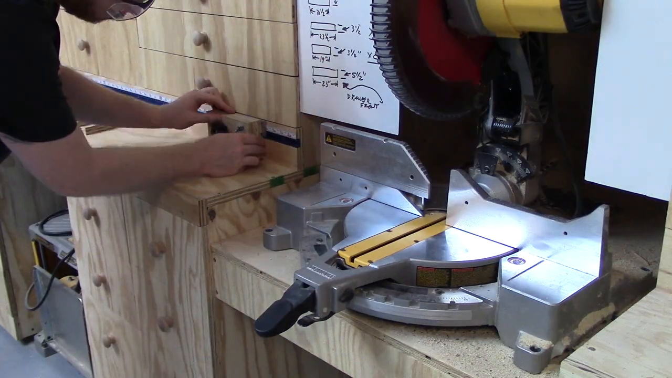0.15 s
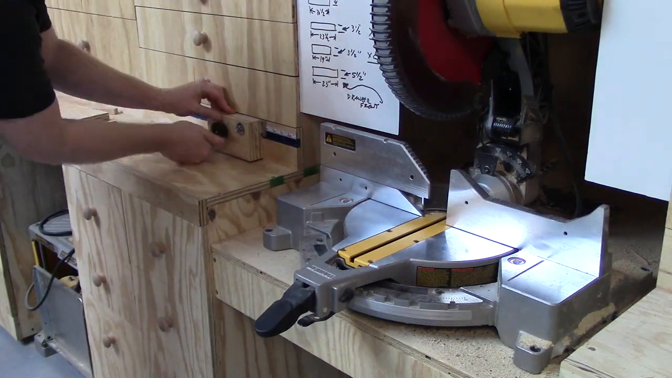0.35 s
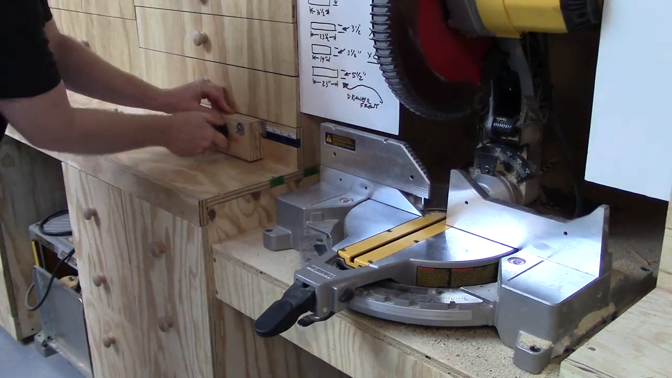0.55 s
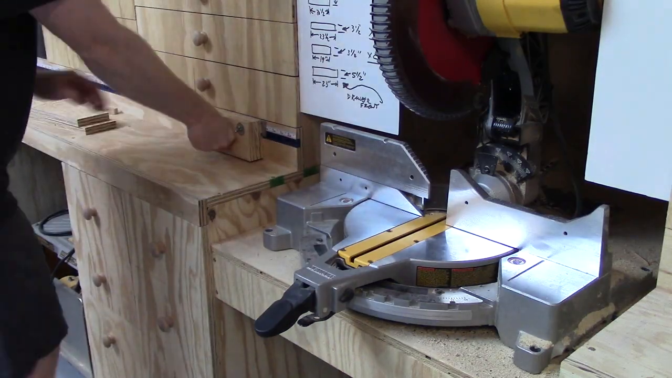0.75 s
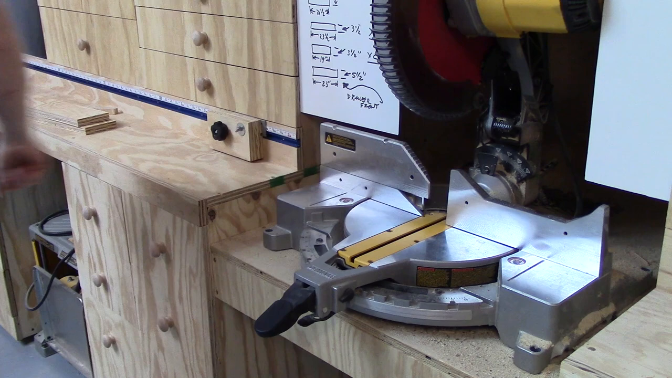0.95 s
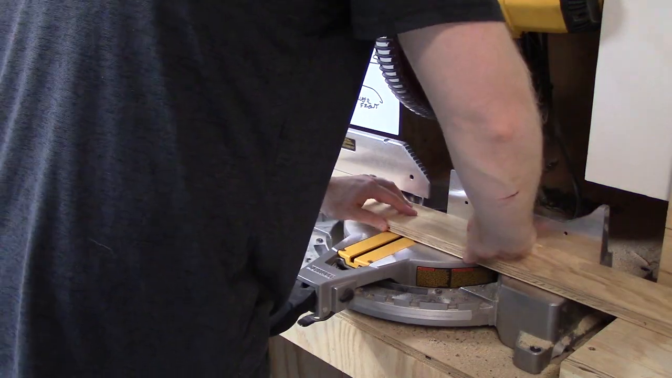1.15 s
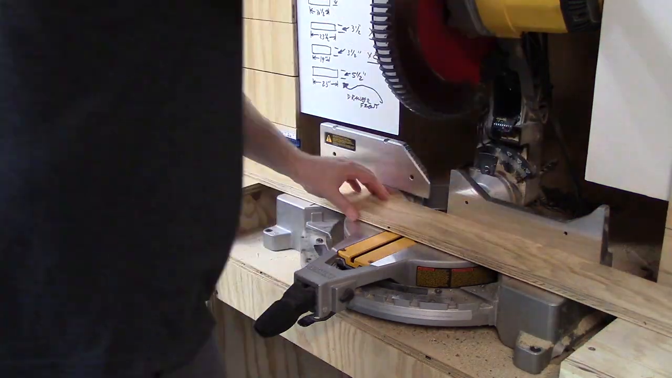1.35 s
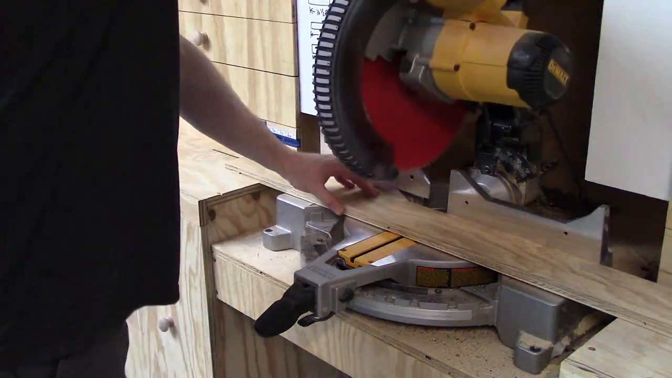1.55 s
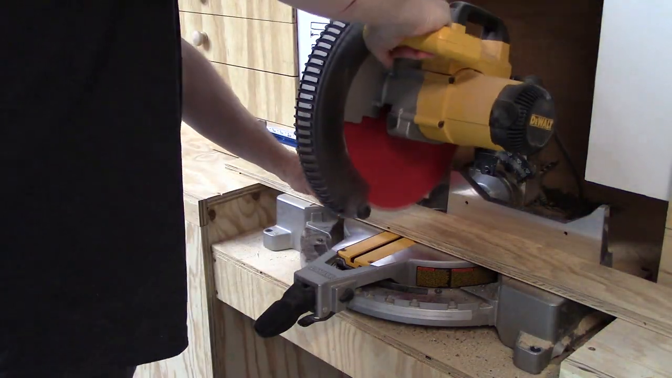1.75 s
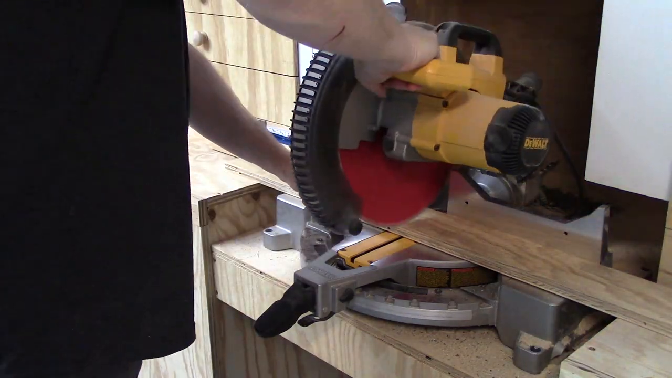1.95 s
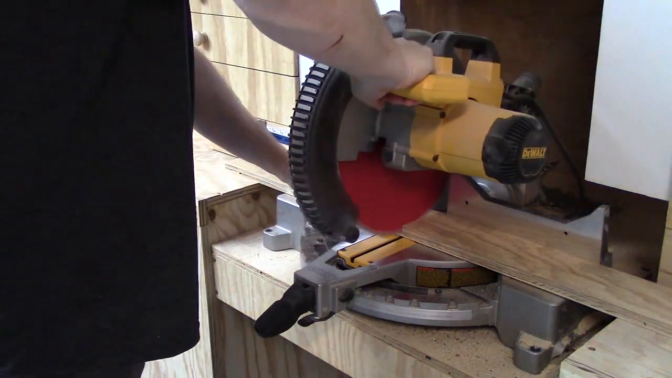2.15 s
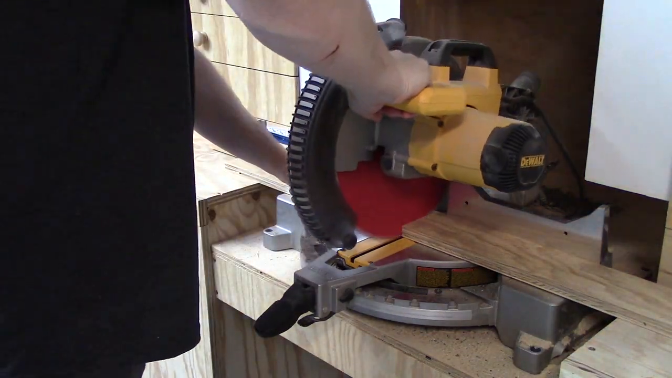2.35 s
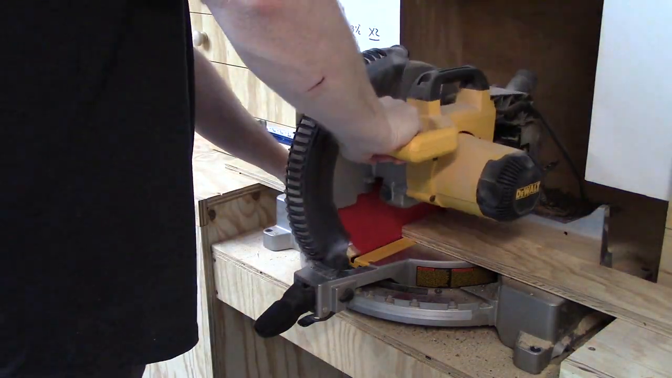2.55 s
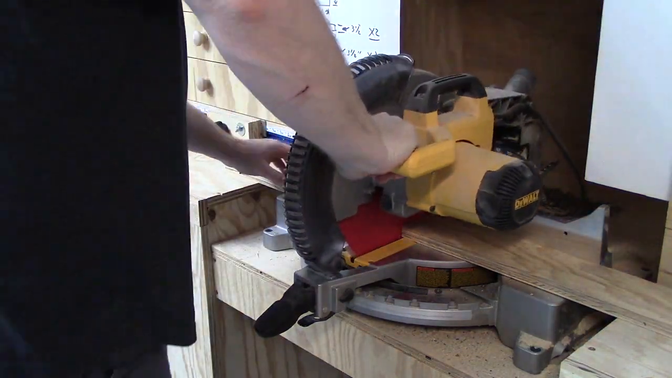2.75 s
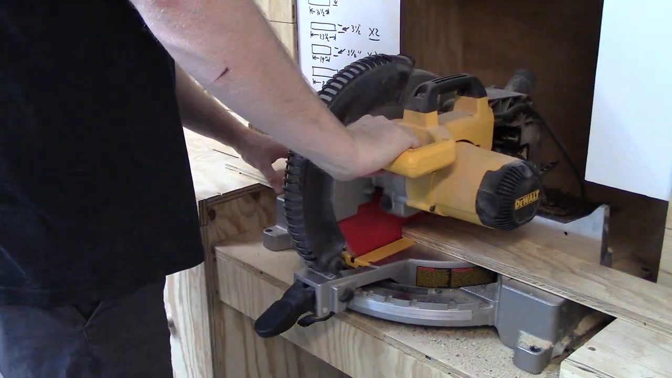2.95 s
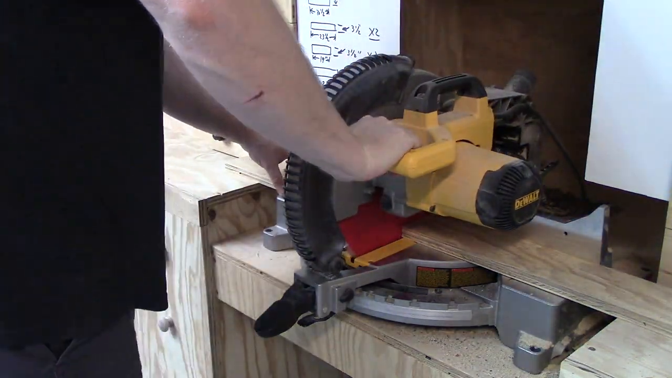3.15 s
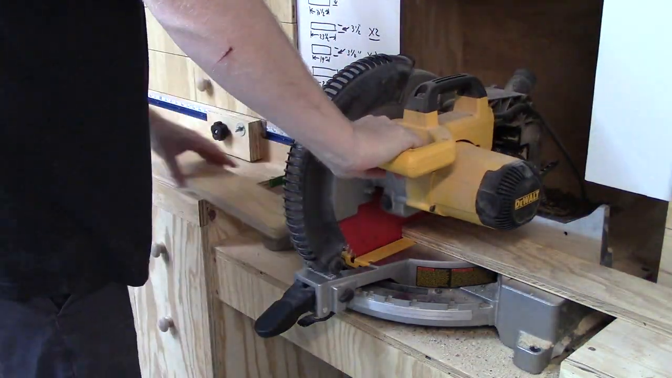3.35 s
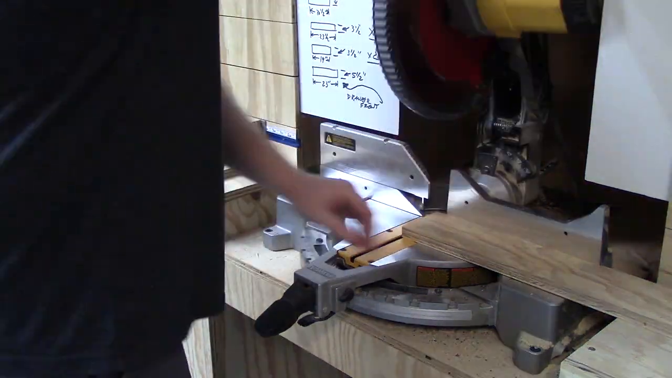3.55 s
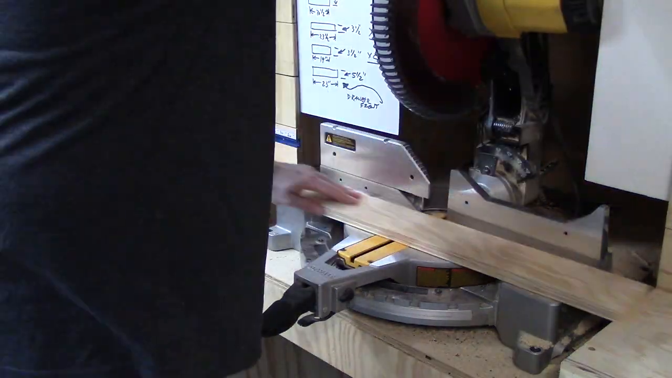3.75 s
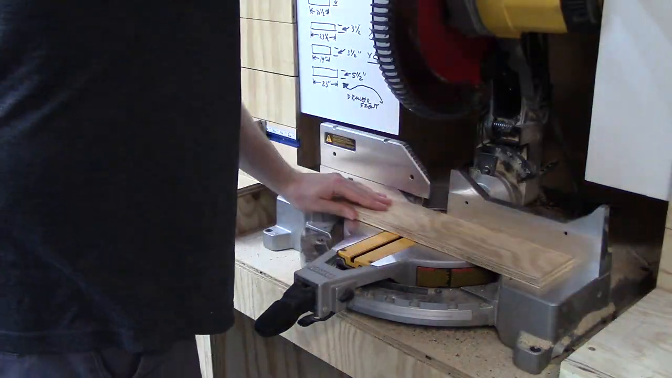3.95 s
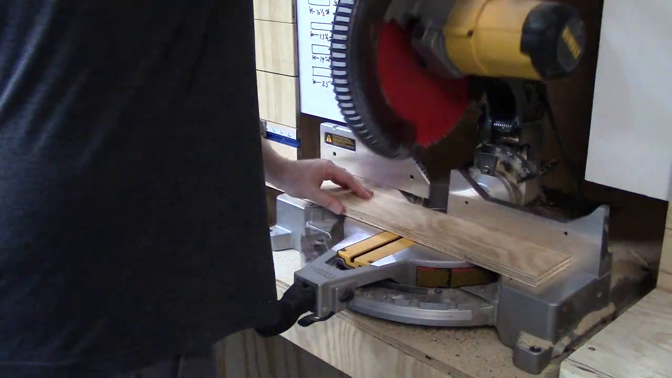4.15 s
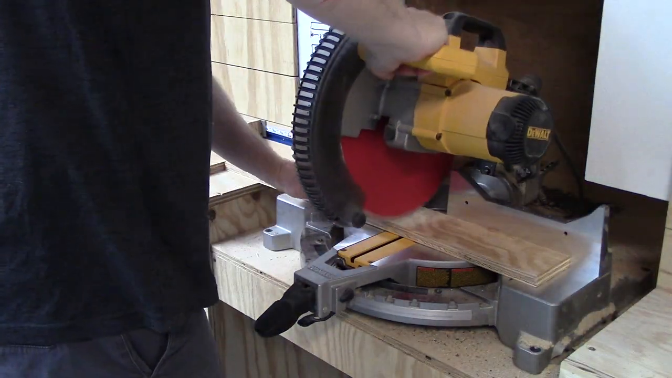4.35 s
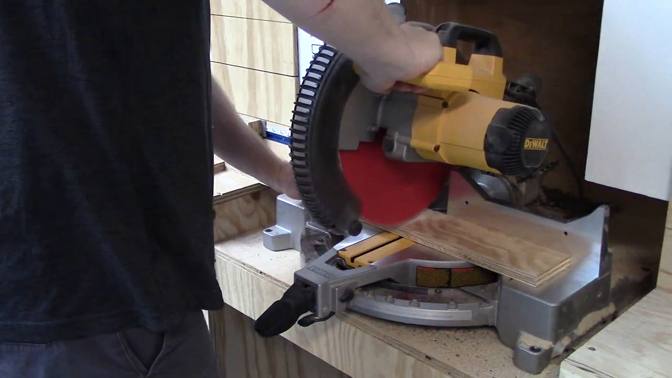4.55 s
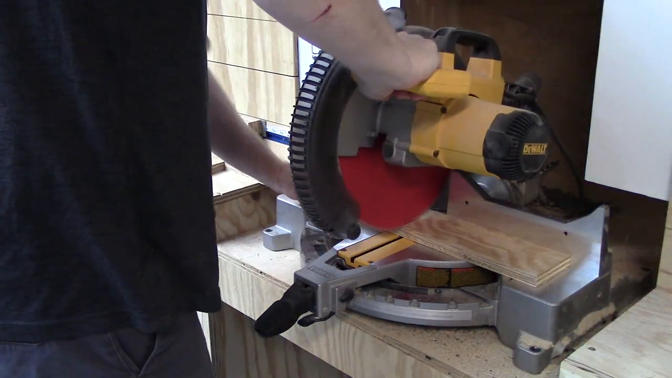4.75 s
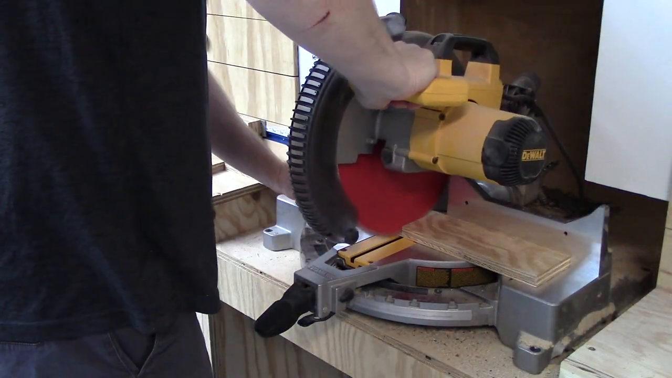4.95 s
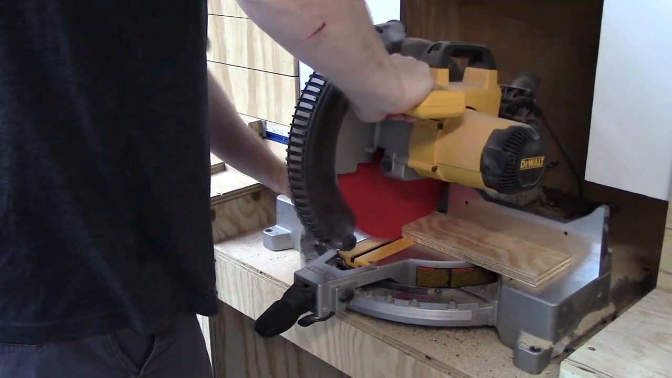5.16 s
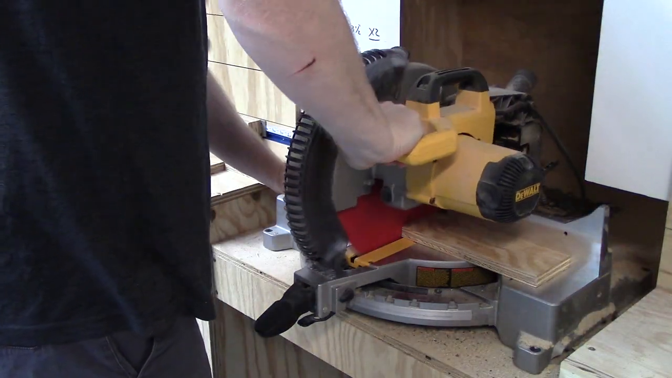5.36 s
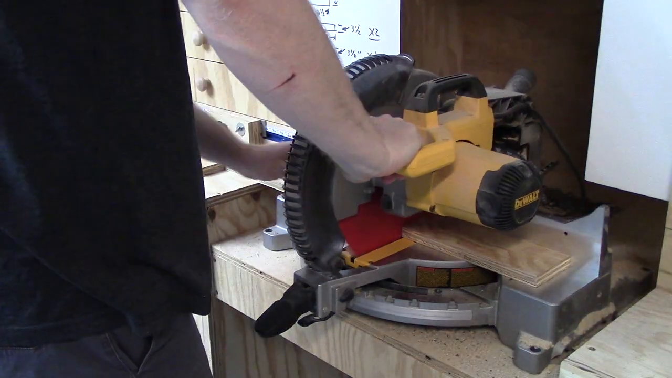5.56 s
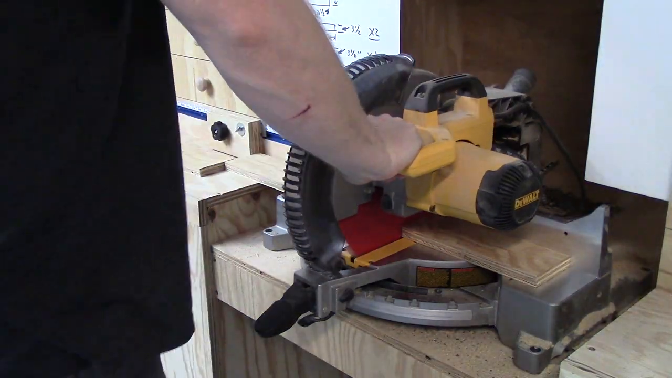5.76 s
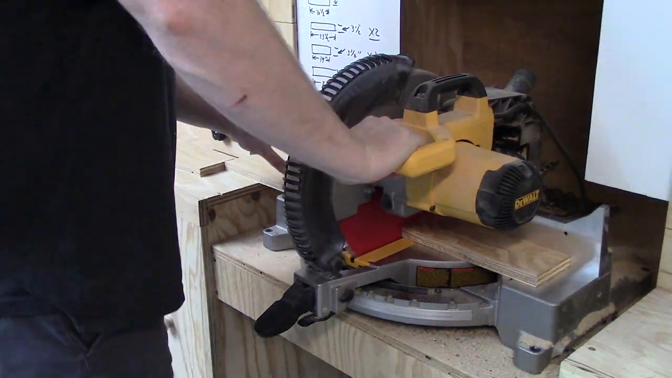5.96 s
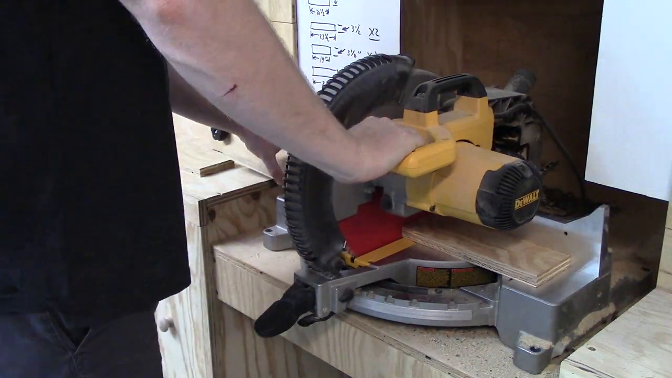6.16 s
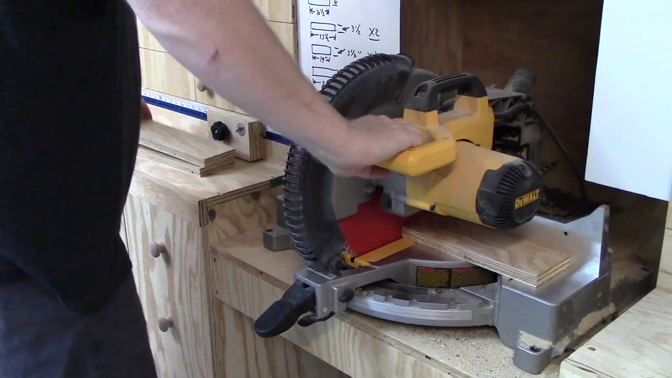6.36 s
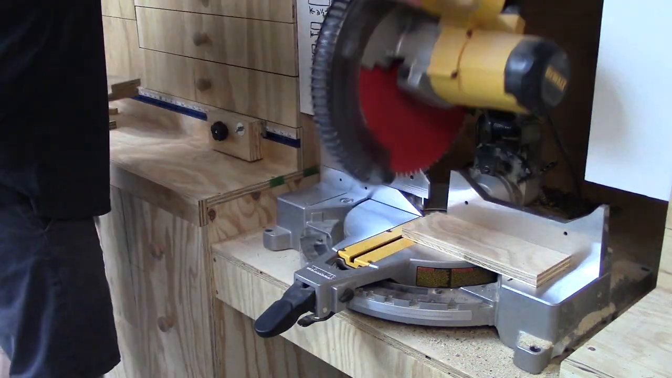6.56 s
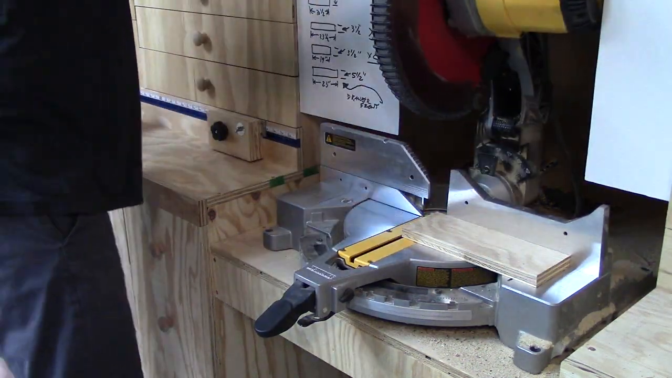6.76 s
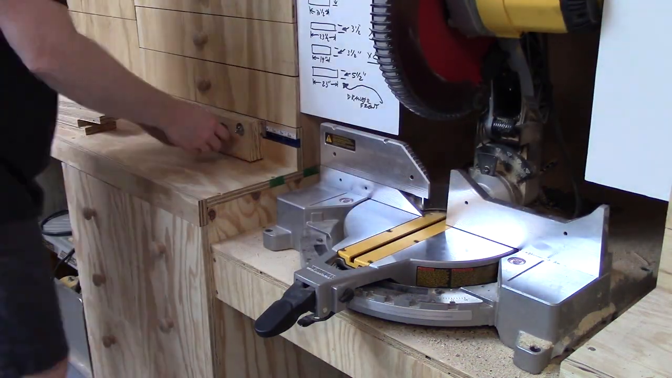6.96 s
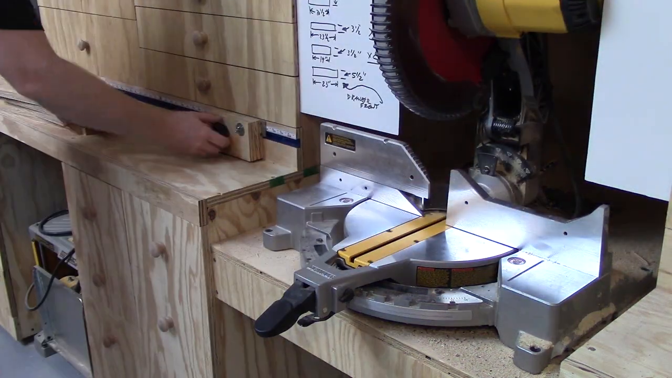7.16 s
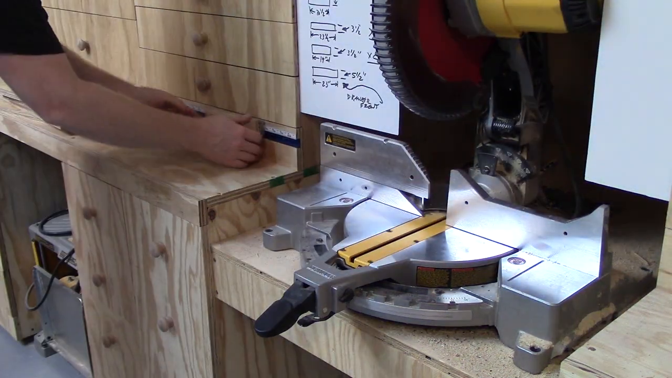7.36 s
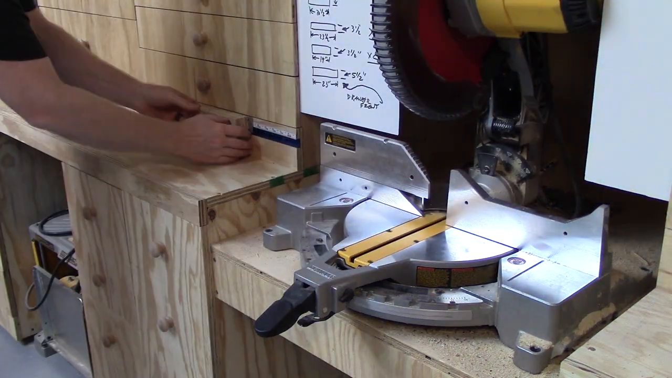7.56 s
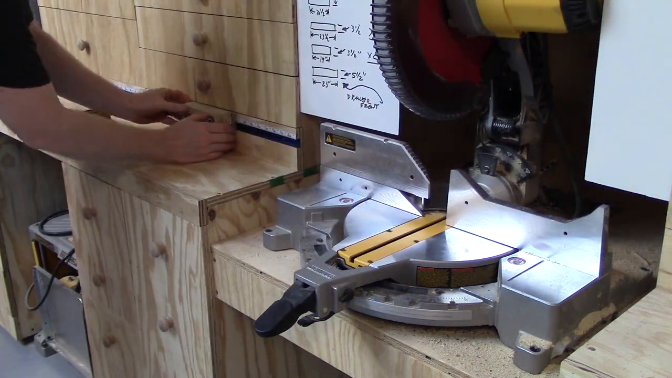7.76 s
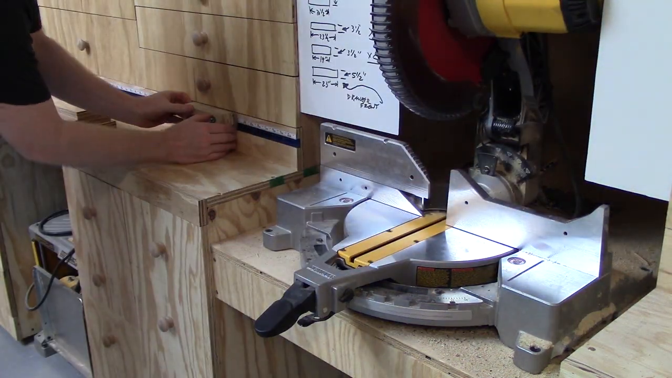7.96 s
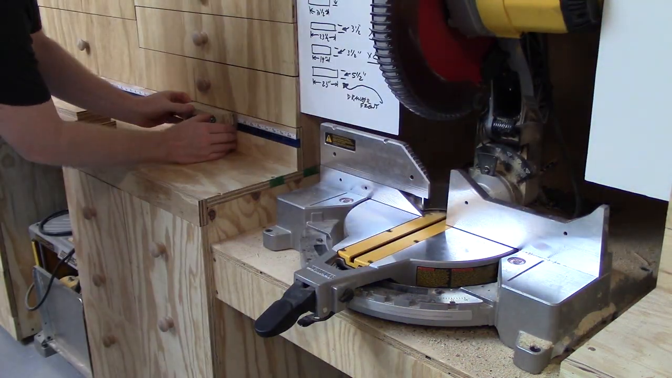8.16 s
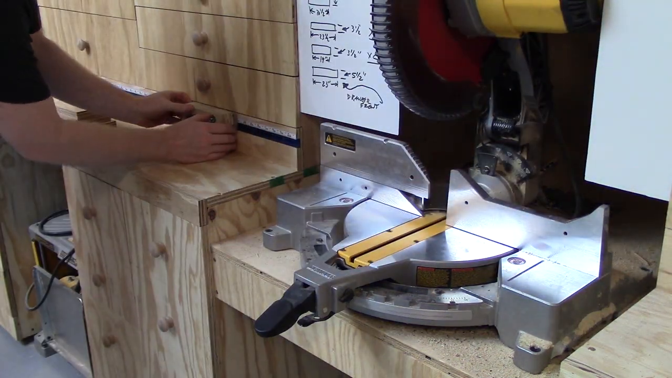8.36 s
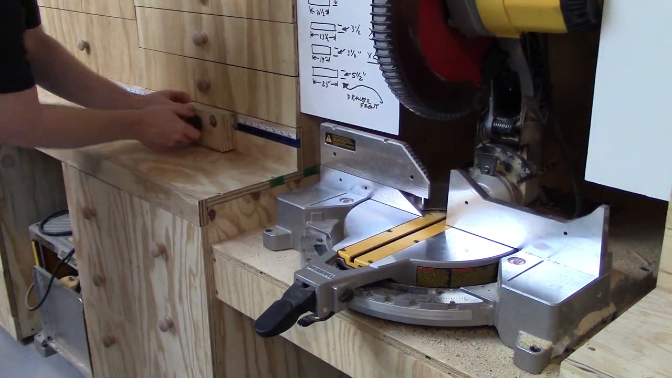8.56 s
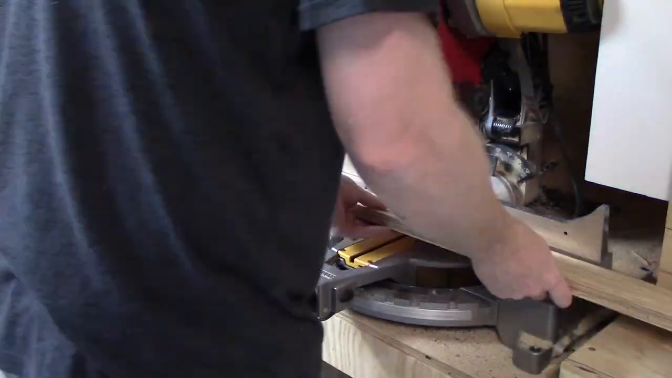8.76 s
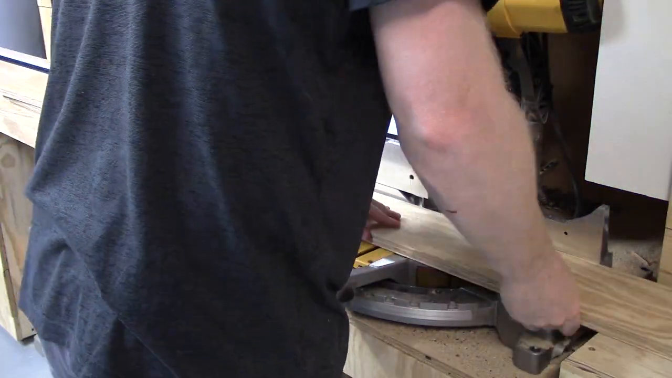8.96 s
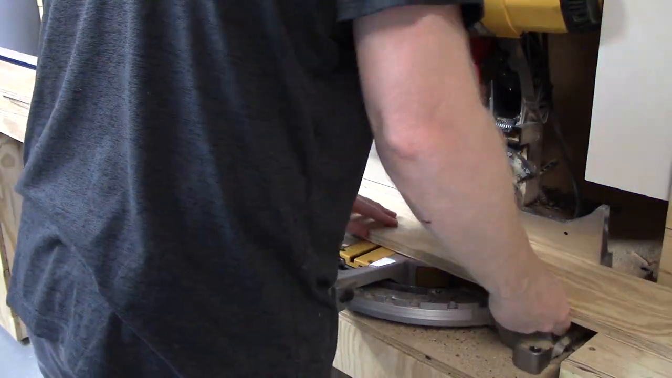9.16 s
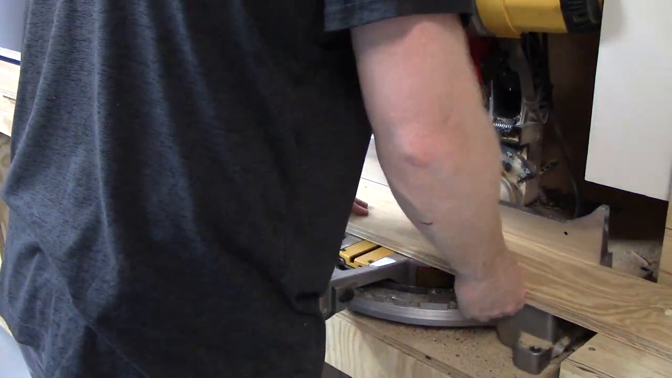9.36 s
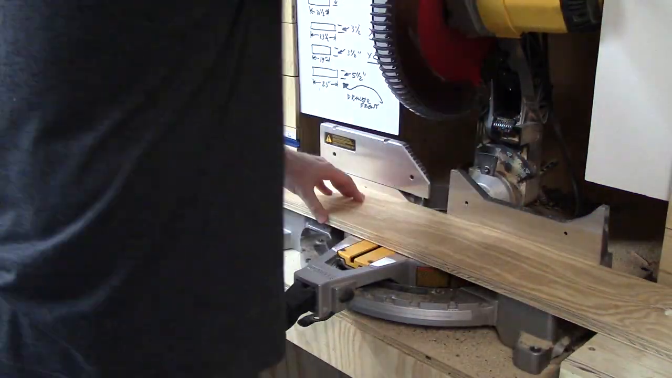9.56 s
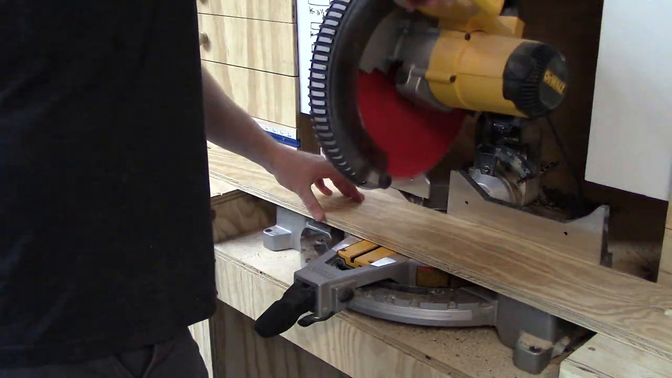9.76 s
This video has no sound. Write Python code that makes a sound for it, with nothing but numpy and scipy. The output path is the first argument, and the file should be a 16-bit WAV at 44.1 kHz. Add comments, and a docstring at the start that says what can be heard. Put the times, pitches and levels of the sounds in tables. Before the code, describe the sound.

A dust extractor drones in a workshop with a fan hum and airy hiss. A miter saw clunks on, whines up to speed, rasps through plywood and brakes with a quickly falling squeal. Boards knock and tap lightly, then a second, slightly longer cut follows. The drone sinks under each cut and swells back. After a few more knocks and sharp ticks, the saw starts again right at the end.

```python
"""Miter saw in a workshop

A dust extractor drones: a fan tone over rumble, rushing air and hiss. A miter saw starts, cuts plywood
and brakes twice, then starts a third time. Its motor roars, its teeth whine and tear the wood, and its
blade rings. The drone sinks while the saw runs and swells back after it; hands knock boards about in
between. Three sharp ticks break the drone, and all but the whine echoes every 43 ms, fading fast."""
import sys
import numpy as np
from scipy import signal
from scipy.fft import rfft, irfft, next_fast_len
from scipy.io import wavfile
from scipy.ndimage import uniform_filter1d

SR = 44100
rng = np.random.default_rng(int(sys.argv[2]) if len(sys.argv) > 2 else 0)


def to_wav(s):
    """Save 16-bit WAV."""
    ch = np.atleast_2d(s).T  # columns
    pcm = np.round(np.clip(ch, -1, 1) * 32767)  # PCM
    wavfile.write(sys.argv[1], SR, pcm.astype(np.int16))


N = 433062


def from_db(db):
    """Turns decibels into a number to multiply a sound by."""
    return 10 ** (np.asarray(db) / 20)


def rms_one(x):
    """Scales a sound so that its average strength (rms) is 1."""
    return x / np.sqrt(np.mean(x ** 2) + 1e-20)


def curve(points, t):
    """Joins (time, value) points with straight lines and reads them at the times t."""
    return np.interp(t, *np.transpose(points))


def at_hz(points, hz):
    """Reads a curve of (frequency, value) points, giving every octave the same room."""
    known_hz, values = np.transpose(points)
    return np.interp(np.log(hz), np.log(known_hz), values)


def panned(db):
    """Left and right gains that make the left side louder by db."""
    return from_db(np.multiply.outer([.5, -.5], db))


def white(size):
    """Plain noise, different on the left and the right."""
    return rng.standard_normal((2, size))


def drift(rate, size=N):
    """A random wobble around zero that heads for a new value `rate` times a second."""
    knots = rng.standard_normal(int(size * rate / SR) + 3)
    return np.interp(np.arange(size) * rate / SR, np.arange(len(knots)), knots)


def resonance(x, hz, width_hz):
    """Makes a sound ring at one pitch; the narrower the width, the longer it rings."""
    r = np.exp(-np.pi * width_hz / SR)
    gain = (1 - r * r) / 2
    return signal.lfilter([gain, 0, -gain], [1, -2 * r * np.cos(2 * np.pi * hz / SR), r * r], x)


def add(out, start_s, sound):
    """Mixes a sound in at a given time."""
    i = round(start_s * SR)
    out[:, i:i + sound.shape[-1]] += sound[..., :N - i]


def echoed(x, gain, count, lag_samples=1882, fade=.5):
    """Adds evenly spaced echoes, each weaker than the one before."""
    return x + gain * sum(fade ** k * np.roll(x, lag_samples * (k + 1), axis=1) for k in range(count))


# How alike the left and right sides of a noise are: (frequency [Hz], likeness [0 to 1])
LEFT_RIGHT_LIKENESS = [(60, 0.23), (130, 0.066), (300, 0.038), (600, 0.1), (1300, 0.007)]
def coloured(spectrum, size=N, grain_db=0.):
    """Stereo noise with a chosen balance of low and high; grain makes it gritty."""
    padded = next_fast_len(size)
    noise = white(padded) * from_db(grain_db * white(padded))
    hz = np.maximum(np.arange(padded // 2 + 1) * SR / padded, 1)
    mid, side = rfft(noise) * from_db(at_hz(spectrum, hz))
    alike = at_hz(LEFT_RIGHT_LIKENESS, hz)
    pair = np.sqrt(1 + alike) * mid + np.sqrt(1 - alike) * side * [[1], [-1]]
    return rms_one(irfft(pair, padded)[:, :size])


# The pitches that stand out in the drone: (pitch [Hz], width [Hz], level [dB])
DRONE_PEAKS = [(268, 16, -62), (351, 9, -62), (490, 12, -60), (595, 14, -66), (700, 12, -68),
               (746, 12, -71), (863, 12, -70)]
# The tone colour of the rumble: (frequency [Hz], relative level [dB])
RUMBLE_COLOUR = [(15, -65), (25, -48), (97, -13.5), (144, -10), (188, 2), (231, -1.5), (260, 0), (340, -34),
                 (570, -120)]
# How the rumble rises and falls: (time [s], level [dB])
RUMBLE_OVER_TIME = [(0, -55), (.27, -48), (1.0, -52), (3.15, -50.5), (3.78, -56), (4.1, -49.5), (5.9, -55),
                    (6.45, -62), (6.75, -47.5), (7.6, -51.5), (9.82, -51.5)]
def drone_rumble():
    """Narrow bands of noise hum and waver at fixed pitches over a low rumble."""
    noise = white(N)
    hums = sum(from_db(db + 2.5 * drift(2.5)) * rms_one(resonance(noise, hz, width))
               for hz, width, db in DRONE_PEAKS)
    lowest_hum = from_db(-6) * rms_one(resonance(noise[0], hz=190, width_hz=7.2))
    rumble_db = curve(RUMBLE_OVER_TIME, np.arange(N) / SR) + .6 * drift(8)
    return hums + from_db(rumble_db) * (coloured(RUMBLE_COLOUR) + lowest_hum)


# The tone colour of the moving air: (frequency [Hz], relative level [dB])
AIR_COLOUR = [(70, -60), (150, -49), (240, -3.5), (350, -2), (415, -5), (480, 0), (620, -8.5), (850, -17),
              (1100, -40)]
def airflow():
    """Air rushes through the extractor with a short echo, a little to the left."""
    loudness = from_db(-43 + .4 * drift(9))
    return loudness * echoed(coloured(AIR_COLOUR), gain=.25, count=2) * panned(1.5)[:, None]


# The tone colour of the hiss: (frequency [Hz], relative level [dB])
HISS_COLOUR = [(470, -6), (800, -10), (870, -3), (980, -9.5), (1200, -6.5), (1960, -7.5), (2130, -10),
               (3200, -6), (7560, -12.5), (11800, -22.5), (13900, -47)]
def duct_hiss():
    """The ducts give a gritty hiss with a faint whistle in it."""
    whistle = from_db(-20 + 3 * drift(3)) * rms_one(resonance(white(N), hz=3120, width_hz=70))
    flicker = from_db(.92 * drift(11))
    hiss = coloured([(200, -60)] + HISS_COLOUR, grain_db=3.)
    return flicker * (hiss + whistle) * panned(1.4)[:, None]


def drone_sink(start_db=13, run_db=6.5, db_per_drag_hz=.0083, smooth_s=.032, swell_db_per_s=16.5):
    """How many dB the drone sinks: it drops at each start, stays down for the cut, then swells back."""
    push_db = np.zeros(N)
    for span, since, hz, drag, braking in saw_motion():
        running_db = (run_db + db_per_drag_hz * drag) * ~braking
        push_db[span] = np.where(since < 2 * smooth_s, start_db, running_db)
    swell_db = swell_db_per_s * np.arange(N) / SR
    held_db = np.maximum.accumulate(push_db + swell_db) - swell_db   # limits how fast it comes back
    r = np.exp(-1 / (smooth_s * SR))
    return signal.lfilter([1 - r], [1, -r], held_db)


# The drone changes its balance in steps:
# (start [s], fan tone [dB], left over right [dB], lag of the left side [radians], hiss [dB])
DRONE_STEPS = [(0, -32.5, 2, 0.02, -45), (2.25, -36, 10, .5, -44), (4.9, -33, 3, 0.92, -44),
               (6.86, -32.5, 2, 0.02, -45.5), (8.66, -33, 4, 0.96, -43.5)]
def extractor(fan_hz=413.6):
    """Passing fan blades hum over rumble, air and hiss; all sink for the saw and dip at each tick."""
    t, sink_db = np.arange(N) / SR, drone_sink()
    step_s, *columns = np.transpose(DRONE_STEPS)
    step = np.searchsorted(step_s, t, "right") - 1
    tone_db, pan_db, lag, hiss_db = (uniform_filter1d(c[step], size=1000) for c in columns)
    phase = 2 * np.pi * np.cumsum(fan_hz + .12 * drift(6)) / SR
    tone = from_db(tone_db - sink_db + .3 * drift(4)) * panned(pan_db) * np.sin([phase - lag, phase])
    rumble = from_db(-.8 * sink_db) * drone_rumble()   # the noises sink less than the tone
    air = from_db(-.7 * sink_db) * airflow()
    hiss = from_db(hiss_db - .75 * sink_db) * duct_hiss()
    dips_db = sum(dip_db * (t > s) * np.exp(-np.abs(t - s) / .025) for s, _, dip_db in SHARP_TICKS)
    return from_db(dips_db) * (tone + rumble + air + hiss)


# Ticks that break the drone: (time [s], level [dB], dip of the drone [dB])
SHARP_TICKS = [(1.0539, -22, -12), (6.8597, -20.5, -4), (8.6605, -17, -2)]
def ticks():
    """Sharp clicks just three samples long, the same on both sides."""
    out = np.zeros((2, N))
    for s, level_db, _ in SHARP_TICKS:
        add(out, s, from_db(level_db) * np.array([[.7, .9, .3]]))
    return out


# Boards set down on the bench: (time [s], peak level [dB], pitch [Hz], time to fade by 60 dB [s])
BENCH_THUMPS = [(0.331, -38, 183, 0.22), (3.151, -39.5, 189, 0.18), (6.73, -38, 190, 0.18),
                (6.8, -38.5, 169, 0.13), (6.855, -52, 90, .05)]
def thumps():
    """A board lands and pushes the bench top into a soft, low thud."""
    out, t = np.zeros((2, N)), np.arange(round(.3 * SR)) / SR
    for s, peak_db, hz, fade_s in BENCH_THUMPS:
        push = rng.standard_normal(len(t)) * np.minimum(t / .0087, 1) * from_db(-60 * t / fade_s)
        blow = resonance(resonance(push, hz, .32 * hz), hz, .63 * hz)
        add(out, s, from_db(peak_db) * blow / np.abs(blow).max())
    return out


# Hands, boards and the trigger lock: (time [s], peak level [dB], pitch [Hz], time to fade by 60 dB [s])
HANDLING_KNOCKS = [(1.5045, -34, 3980, 0.08), (3.4965, -31, 2970, 0.1), (4.016, -36, 2600, .05),
                   (4.1533, -29.5, 3600, 0.07), (6.4357, -26.5, 2540, 0.096), (8.8332, -35, 1500, 0.073),
                   (9.1737, -40, 1200, 0.07), (9.69, -28, 3670, 0.079)]
def knocks():
    """Short blows, each a burst of noise with a colour of its own."""
    out, t = np.zeros((2, N)), np.arange(round(.15 * SR)) / SR
    for s, peak_db, hz, fade_s in HANDLING_KNOCKS:
        width_hz = 250 + hz ** 2 / 6000   # low knocks ring hollow, high ones are scuffs
        burst = white(len(t)) * np.minimum(t / .0053, 1) * from_db(-60 * t / fade_s)
        blow = resonance(resonance(burst, hz, width_hz), hz, 2 * width_hz)
        add(out, s, from_db(peak_db) * blow / np.abs(blow).max())
    return out


# The notes of a struck board: (pitch [Hz], relative level [dB], time to fade by 60 dB [s])
BOARD_NOTES = [(1297, 0, .035), (2439, -12, .03), (3068, -4, .035), (4840, -12, .02)]
# A board meets the stop block: (time [s], level [dB])
BOARD_TAPS = [(3.828, -35.5), (3.9875, -31)]
def taps():
    """A board hits the stop block and rings briefly, a little differently each time."""
    out, t = np.zeros((2, N)), np.arange(round(.15 * SR)) / SR
    for s, level_db in BOARD_TAPS:
        tap = np.zeros((2, len(t)))
        for hz, db, fade_s in BOARD_NOTES:
            loudness = from_db(db - 60 * t / fade_s + rng.normal(0, 2, (2, 1)))
            tap += loudness * np.sin(2 * np.pi * hz * t + rng.uniform(0, 2, (2, 1)))
        add(out, s, from_db(level_db) * np.minimum(t / .003, 1) * tap)
    return out


GEARCASE_RING_HZ, GEARCASE_WIDTH_HZ = 2900, 110
# The trigger is let go: (time [s], peak level [dB])
TRIGGER_RELEASES = [(2.64, -40), (5.5018, -25.5)]
def trigger_snaps():
    """The trigger snaps back and rings the case around the gears."""
    out, t = np.zeros((2, N)), np.arange(round(.15 * SR)) / SR
    for s, peak_db in TRIGGER_RELEASES:
        snap = white(len(t)) * np.minimum(t / .004, 1) * np.exp(-t / .02)
        ring = resonance(snap, GEARCASE_RING_HZ, GEARCASE_WIDTH_HZ) + .04 * snap
        add(out, s, from_db(peak_db) * ring / np.abs(ring).max())
    return out


# Each run of the saw: (start [s], brake [s], clunk [dB], mains buzz [dB], buzz an octave up [dB],
# gearcase ring within the clunk [dB], boost of roar and rasp [dB], brake jolt [dB], brake squeal [dB],
# cutting whine [dB], idle whine [dB], unevenness of the whine [factor])
SAW_RUNS = [(1.61, 2.652, -22, -62, -58, -6, -1, -48, -51, -43, -44.5, .7),
            (4.2416, 5.507, -19, -39, -35.5, -1, .5, -41, -44, -45, -47, 1.1),
            (9.7727, 10.5, -19.5, -54, -38, 1, 0, -40, -40, -38, -44, 1.1)]
# Drag is how far the wood slows the saw, in teeth passing per second: (time [s], drag [Hz])
WOOD_DRAG = [(1.99, 1), (2.055, 640), (2.41, 900), (2.45, 760), (2.52, 650), (2.59, 380), (2.66, 1.5),
             (4.595, 0), (4.615, 620), (4.65, 360), (4.75, 380), (4.85, 620), (4.97, 680), (5.29, 680),
             (5.36, 329), (5.52, 199), (5.55, 0)]
def saw_motion(kick_hz=1757, free_hz=4910, trail_hz=900, spin_s=.145, brake_lag_s=.075, coast_s=.28):
    """Gives each run's place in the sound, time since its start, teeth per second, drag and braking."""
    r = np.exp(-1 / (spin_s * SR))   # the heavy rotor takes time to change speed
    for start, brake, *_ in SAW_RUNS:
        first, end = round(start * SR), min(round((brake + coast_s) * SR), N)
        t = np.arange(first, end) / SR
        drag, braking = curve(WOOD_DRAG, t), t > brake
        hz = signal.lfilter([1 - r], [1, -r], free_hz - drag, zi=[kick_hz])[0]
        last_hz = hz[~braking][-1]   # from here the brake grips hard, then lets the blade trail
        hz[braking] = trail_hz + (last_hz - trail_hz) * np.exp((brake - t[braking]) / brake_lag_s)
        yield slice(first, end), t - start, hz, drag, braking


# The dull notes of the case around the gears: (pitch [Hz], width [Hz], relative level [dB])
GEARCASE_NOTES = [(1420, 560, -6.5), (2110, 360, -3.5), (2650, 300, 0), (4950, 560, -11), (7900, 1100, -16)]
def saw_starts(mains_buzz_hz=120):
    """The gearcase clunks and rattles, and the motor buzzes as the current rushes in."""
    out, t = np.zeros((2, N)), np.arange(round(.3 * SR)) / SR
    phase = 2 * np.pi * mains_buzz_hz * t
    for start, _, clunk_db, buzz_db, octave_db, ring_db, *_ in SAW_RUNS:
        rattle = white(len(t)) * np.minimum(t / .005, 1) * (np.exp(-t / .012) + .55 * np.exp(-t / .045))
        clunk = sum(from_db(db) * resonance(rattle, hz, width) for hz, width, db in GEARCASE_NOTES)
        clunk += from_db(ring_db) * 1.84 * resonance(rattle, GEARCASE_RING_HZ, GEARCASE_WIDTH_HZ)
        buzz = from_db(buzz_db) * np.sin(phase) + from_db(octave_db) * np.sin(2 * phase)
        surge = buzz * np.minimum(t / .012, 1) * np.exp(-t / .045)
        add(out, start, from_db(clunk_db) * clunk + surge)
    return out


def patchy(x, wobble_db=1.5):
    """Splits a sound into bands from low to high and lets each swell and sink on its own."""
    size = x.shape[1]
    padded, edges = next_fast_len(size), np.r_[0, np.geomspace(1400, 11000, num=10), SR]
    spectrum, hz = rfft(x, padded), np.arange(padded // 2 + 1) * SR / padded
    bands = (irfft(spectrum * (hz >= low) * (hz < high), padded) for low, high in zip(edges, edges[1:]))
    return sum(from_db(wobble_db * drift(13, size)) * band[:, :size] for band in bands)


FULL_DRAG_HZ, BITE_DRAG_HZ = 800, 100   # the drag of a heavy cut, and of the teeth first biting
# The tone colour of tearing wood: (frequency [Hz], relative level [dB])
RASP_COLOUR = [(880, -32), (1500, -24), (2910, -6), (3430, -6), (4050, -10), (4520, -4.5), (6350, -2),
               (10700, -1), (13500, -27.5)]
def wood_rasp(level_db, drag, split_hz=6000):
    """Teeth tear through hard and soft layers of plywood; more drag makes the rasp brighter."""
    size = len(drag)
    torn = coloured(RASP_COLOUR, size, grain_db=2.5)
    dull = signal.sosfilt(signal.butter(4, split_hz, fs=SR, output="sos"), torn)
    bright = signal.sosfilt(signal.butter(4, split_hz, "high", fs=SR, output="sos"), torn)
    layers_db = level_db + 1.3 * drift(19.02, size)
    dull_db = layers_db + 1.1 * drift(15.67, size)
    bright_db = layers_db + .005 * (drag - FULL_DRAG_HZ + 150) + 1.7 * drift(16.1, size)
    return from_db(dull_db) * dull + from_db(bright_db) * bright


def low_blade_ring(since_bite, drag):
    """The blade's lowest note is struck as the teeth bite and rings on faintly through the cut."""
    struck = from_db(-47) * np.exp(-since_bite / .13) * (drag > BITE_DRAG_HZ)
    held = from_db(-60) * drag / FULL_DRAG_HZ
    flicker = from_db(4 * drift(22, len(drag)))
    return (struck + held) * flicker * rms_one(resonance(white(len(drag)), hz=1580, width_hz=30))


# The notes of the steel blade: (pitch [Hz], relative level [dB], time to fade by 60 dB [s])
BLADE_NOTES = [(2536, -7, 0.058), (2640, -10, .04), (2956, 0, 0.07), (3150, -6, .03), (3604, -2.5, 0.036),
               (3726, -8, .05), (4250, -6, .07), (4980, -8, .5), (4910, -1, 0.03), (5420, -9, .05),
               (5670, -7, .03), (6170, -4, .06), (6300, -5, .05), (6445, -5.5, 0.055), (6720, -9, .04),
               (7100, -9, .04), (7600, -15, 0.089)]
def blade_ring(low_shake, high_shake, split_hz=5500):
    """The shaken blade rings at many pitches, each coming and going."""
    out = np.zeros((2, N))
    for hz, level_db, fade_s in BLADE_NOTES:
        width_hz = np.log(1000) / np.pi / fade_s
        loudness = from_db(level_db + 2 * drift(20) + 3 * drift(7) - .6)
        make_up = np.sqrt(SR / np.pi / width_hz)   # a narrow note catches less of the shaking
        shake = high_shake if hz > split_hz else low_shake
        out += loudness * make_up * resonance(shake + 1e-18, hz, width_hz)
    return out


# The tone colour of the motor: (frequency [Hz], relative level [dB])
ROAR_COLOUR = [(290, -44), (500, -10), (726, -8), (1050, -17), (1630, -7), (2600, -1), (4030, 2),
               (5260, -3.5), (8610, -8), (11000, -13), (13500, -35), (22000, -120)]
# The motor roars louder as it speeds up: (teeth per second [Hz], level [dB])
ROAR_LEVELS = [(600, -62), (1500, -54), (2850, -44.5), (4100, -38), (4500, -34.5), (4750, -32)]
# So does the swish of the teeth in free air: (teeth per second [Hz], level [dB])
SWISH_LEVELS = [(700, -70), (2850, -55), (4050, -44.5), (4750, -36)]
def saw_noise(inrush_db=10, brake_db=3, cut_db=-34):
    """The motor roars, the teeth tear the wood, and both set the blade ringing."""
    out, low_shake, high_shake = np.zeros((3, 2, N))
    for (span, since, hz, drag, braking), run in zip(saw_motion(), SAW_RUNS):
        start, brake, *_, boost_db, jolt_db = run[:8]
        size, cutting = len(hz), drag > BITE_DRAG_HZ
        since_bite = np.abs(since - since[np.argmax(cutting)])
        out[:, span] += low_blade_ring(since_bite, drag)
        # The blade is shaken when the brake grips and when it first meets the wood.
        jolt = from_db(jolt_db) * braking * np.exp(-np.abs(start + since - brake) / .03) * white(size)
        bite = from_db(-41.5) * cutting * np.exp(-since_bite / .16) * white(size)
        roar_db = boost_db + at_hz(ROAR_LEVELS, hz) + inrush_db * np.exp(-since / .04) + brake_db * braking
        swish = from_db(at_hz(SWISH_LEVELS, hz))
        tearing = from_db(cut_db) * np.abs(drag / FULL_DRAG_HZ) ** .55
        rasp_db = boost_db + 20 * np.log10(np.hypot(swish, tearing))
        roar = from_db(roar_db + 1.3 * drift(18, size)) * coloured(ROAR_COLOUR, size, grain_db=2.5)
        out[:, span] += panned(-.9)[:, None] * patchy(roar + wood_rasp(rasp_db, drag))
        # The blade's low notes feel the motor and the rasp, its high notes only the rasp.
        low_shake[:, span] += jolt + bite + from_db(.31 * roar_db + .7 * rasp_db - 9) * white(size)
        high_shake[:, span] += from_db(rasp_db - 8) * white(size)
    return out + blade_ring(low_shake, high_shake)


# The blade guard booms as the whine sweeps past: (pitch [Hz], half width [Hz], boost when braking [dB])
GUARD_BOOMS = [(2900, 220, 13), (3900, 260, 13)]
# The motor's sliding contacts sing as it slows: (teeth per second [Hz], level [dB])
CONTACT_LEVELS = [(900, -72), (1100, -60), (1500, -56), (2000, -53), (2300, -58), (2500, -84)]
# The tone an octave above the whine: (time [s], level [dB])
OCTAVE_OVER_TIME = [(2.04, -58), (2.09, -38.5), (2.38, -39), (2.45, -58), (4.6, -58), (4.64, -37.5),
                    (5.1, -37.5), (5.17, -42), (5.33, -43), (5.4, -58)]
def saw_whine(sing_drag_hz=445, hush_hz=2600, contacts_per_tooth=5, gear_per_tooth=.63):
    """Passing teeth make a tone, rough while the speed changes; gears and motor contacts sing along."""
    out = np.zeros((2, N))
    for (span, since, hz, drag, braking), run in zip(saw_motion(), SAW_RUNS):
        start, *_, squeal_db, cutting_db, idle_db, uneven = run
        size, singing = len(hz), np.clip(drag / sing_drag_hz, 0, 1) ** 2
        free_db = idle_db - .0035 * (4910 - hz)   # quieter below full speed
        running_db = cutting_db * singing + free_db * (1 - singing)
        tooth_db = np.where(braking, squeal_db - .1 * np.maximum(hush_hz - hz, 0), running_db)
        hz_per_s = uniform_filter1d(np.gradient(hz) * SR, size=900)
        rough = np.clip(np.abs(hz_per_s) / 8500, 0, 1) ** 2
        pitch_wobble = (.0018 * uneven + .025 * rough) * drift(150, size)
        phase = 2 * np.pi * np.cumsum(hz * (1 + pitch_wobble)) / SR
        guard_db = sum(db / (1 + ((hz - centre) / width) ** 2) for centre, width, db in GUARD_BOOMS)
        octave_db = curve(OCTAVE_OVER_TIME, start + since) - 15 * braking
        contacts_db = np.where(hz_per_s < 0, at_hz(CONTACT_LEVELS, hz), -120)
        gear_db = tooth_db - 20 + 17 * rough * (hz_per_s > 0)   # gears growl while speeding up
        tones = [(1, tooth_db + np.where(braking, 1, .7) * guard_db), (2, octave_db), (3, octave_db - 19),
                 (contacts_per_tooth, contacts_db), (gear_per_tooth, gear_db)]
        side_phase = .7 * drift(11.37, size)   # reflections shift one side against the other
        for multiple, level_db in tones:
            flutter_db = 1.8 * np.array([drift(39.4, size), drift(42., size)])
            flutter_db += (multiple == 1) * uneven * 2.5 * drift(16, size)   # the main tone comes and goes
            smear = np.clip(.6 * uneven / multiple ** 2 + rough, 0, np.where(braking, .3, .7))
            chatter = np.sqrt(1 - smear) + np.sqrt(smear) * drift(260, size)   # uneven teeth blur the tone
            tone = np.sin([multiple * phase, multiple * (phase + side_phase)])
            out[:, span] += from_db(level_db + np.where(braking, .4, 1) * flutter_db) * chatter * tone
    return out


def scene():
    """Mixes it all: steady noise echoes four times, blows once, ticks twice, the whine not at all."""
    steady = echoed(extractor() + saw_noise(), gain=.35, count=4) / 1.08
    blows = echoed(saw_starts() + knocks() + taps() + trigger_snaps() + thumps(), gain=.086, count=1)
    return steady + blows + echoed(ticks(), gain=.55, count=2) + saw_whine()


def record(dry, bass_hz=38, treble_hz=12250, cutoff_hz=14000):
    """The microphone loses deep bass and high treble, and the very top is cut off."""
    heard = signal.sosfilt(signal.butter(2, bass_hz, "high", fs=SR, output="sos"), dry)
    heard = signal.sosfilt(signal.butter(4, treble_hz, fs=SR, output="sos"), heard)
    return signal.sosfilt(signal.cheby2(24, 70, cutoff_hz, fs=SR, output="sos"), heard)


dry = scene()
out = record(dry)
to_wav(out)
```